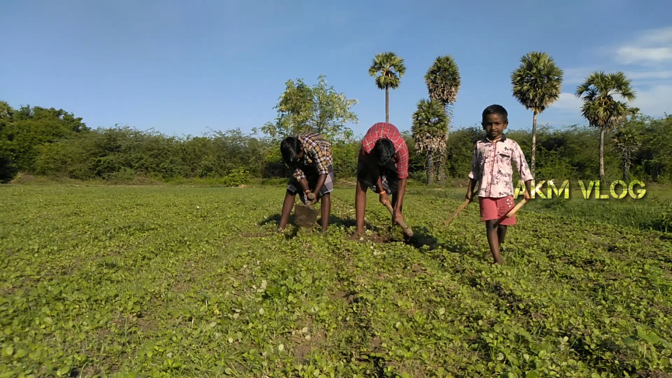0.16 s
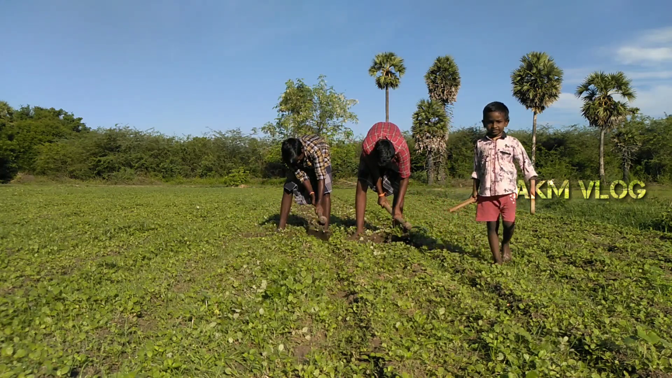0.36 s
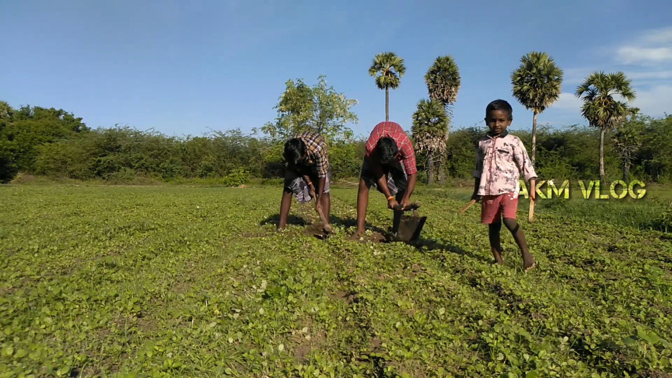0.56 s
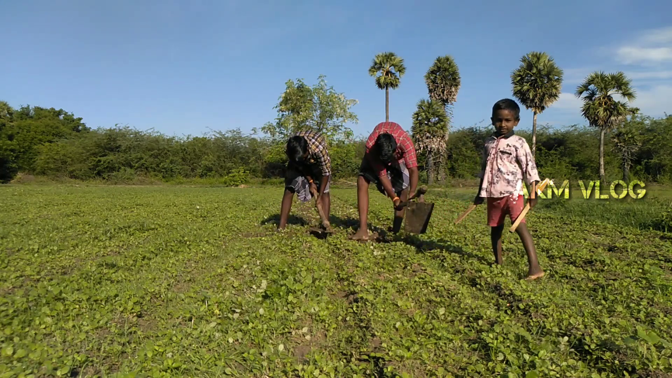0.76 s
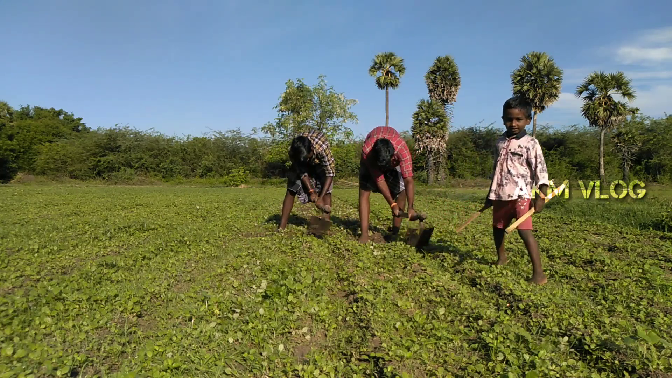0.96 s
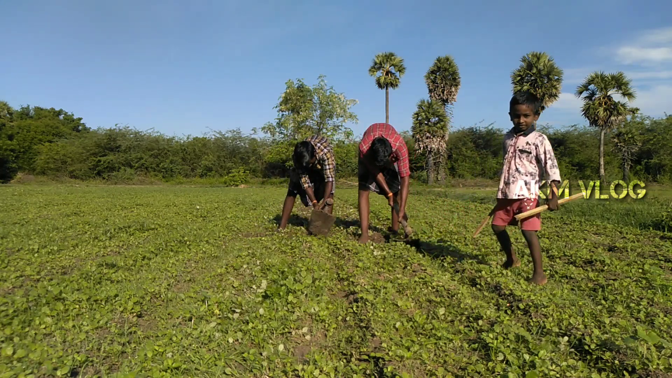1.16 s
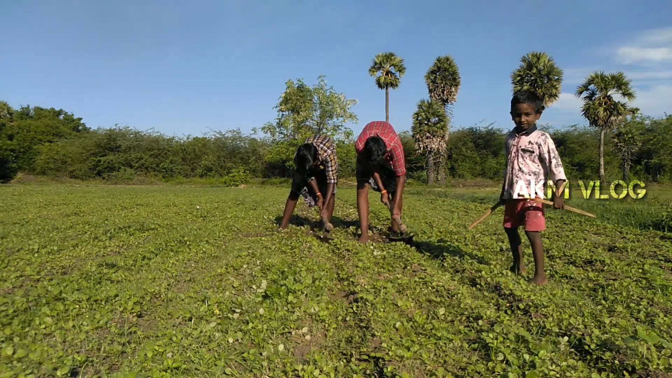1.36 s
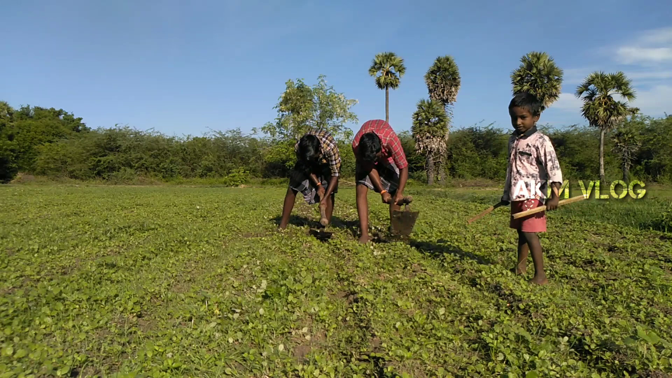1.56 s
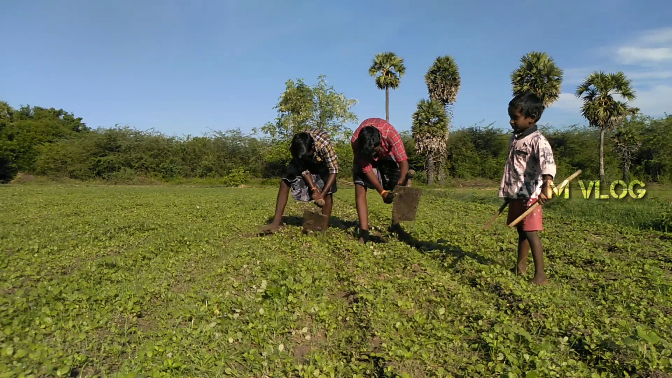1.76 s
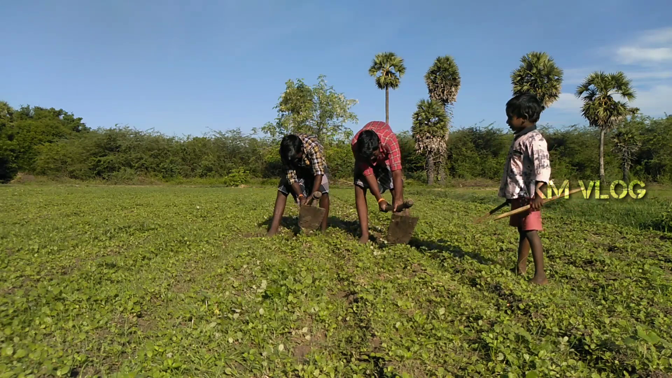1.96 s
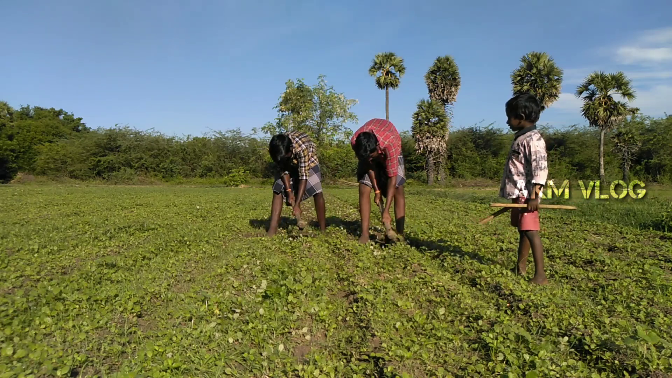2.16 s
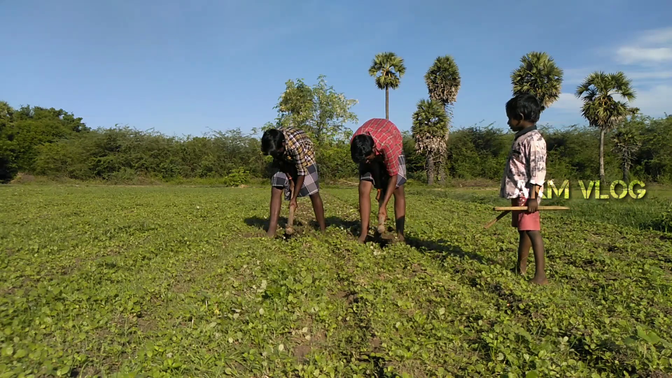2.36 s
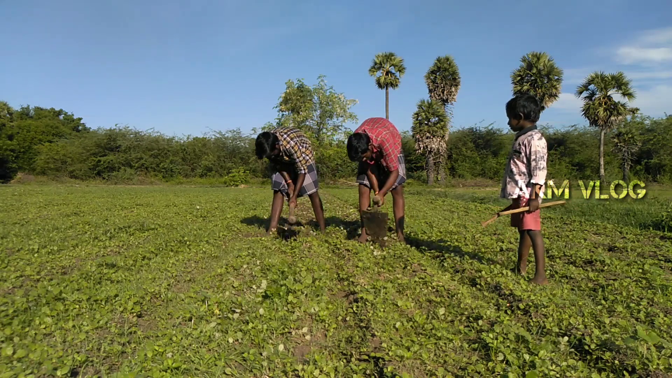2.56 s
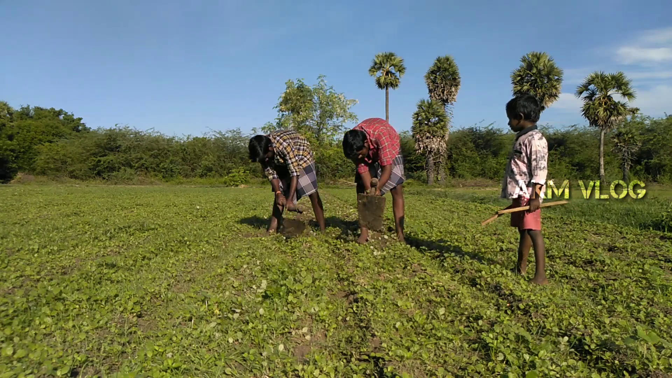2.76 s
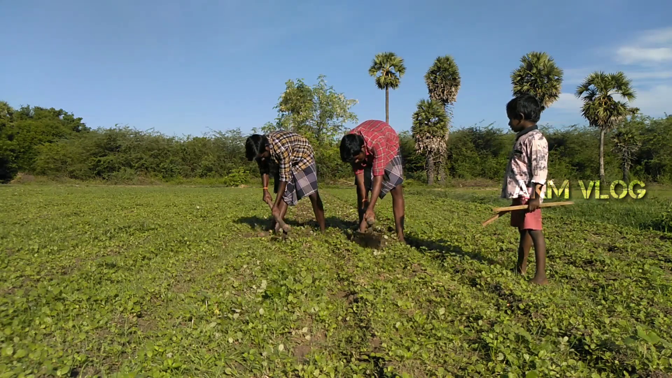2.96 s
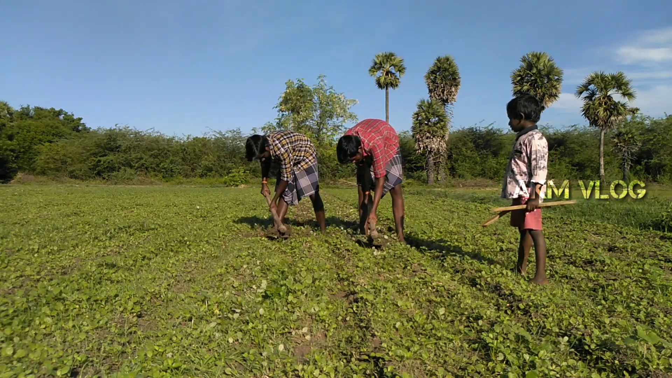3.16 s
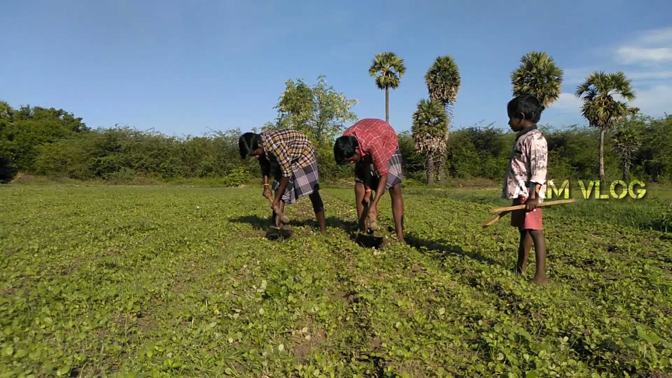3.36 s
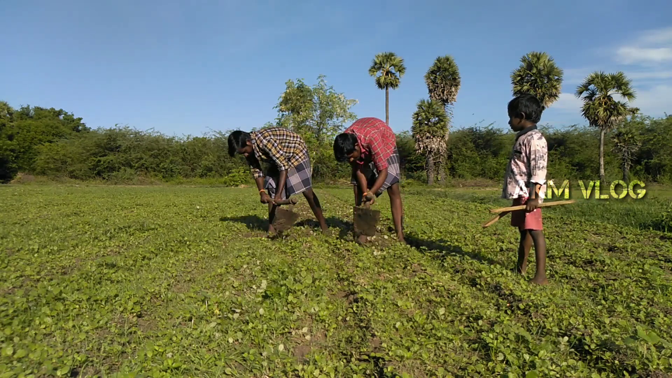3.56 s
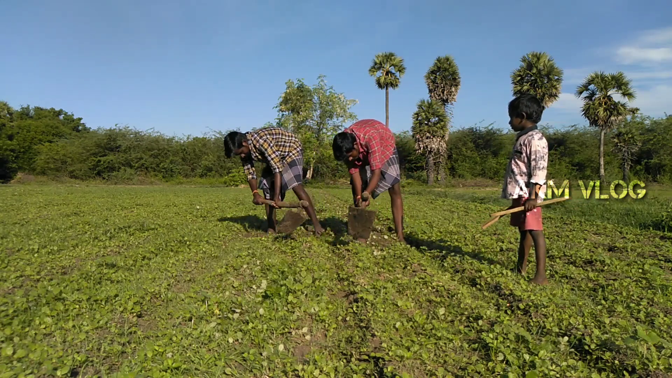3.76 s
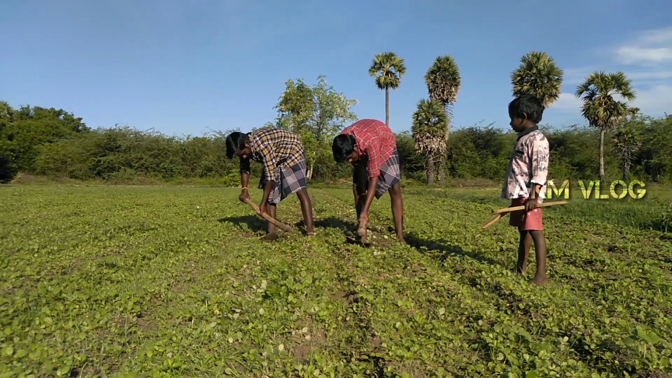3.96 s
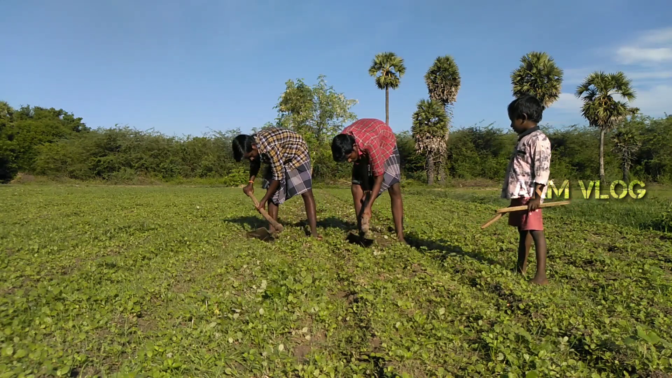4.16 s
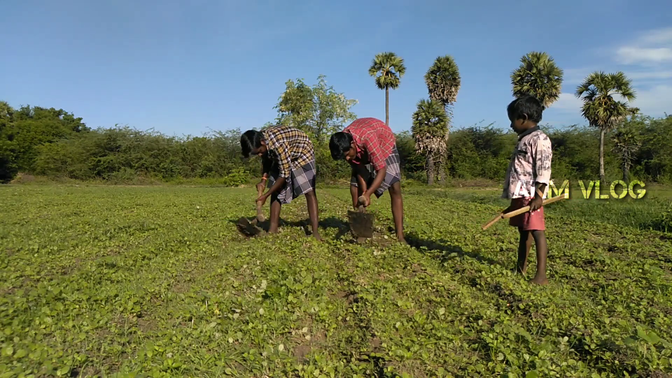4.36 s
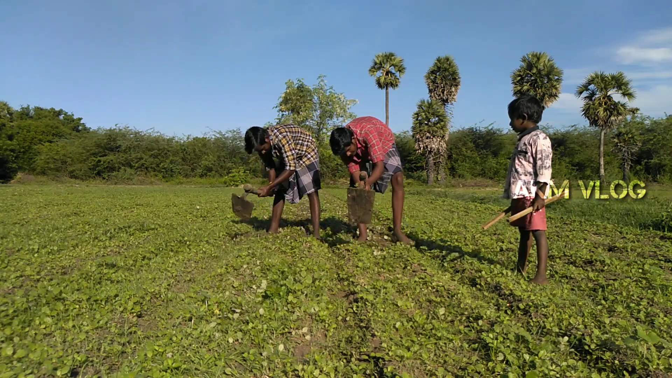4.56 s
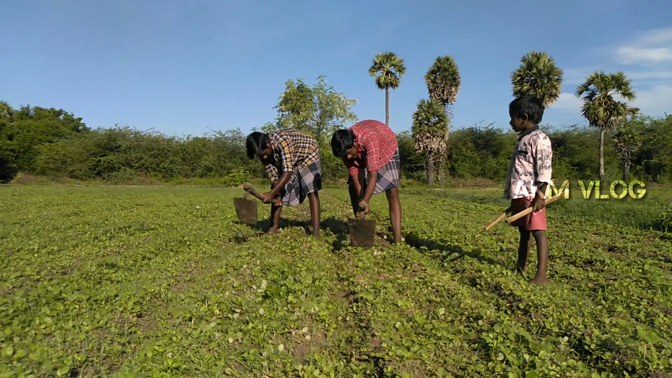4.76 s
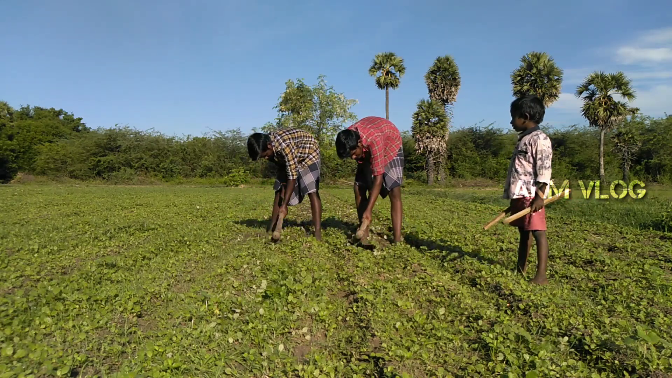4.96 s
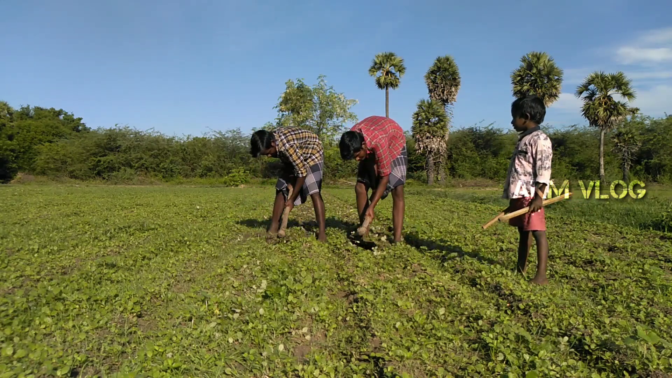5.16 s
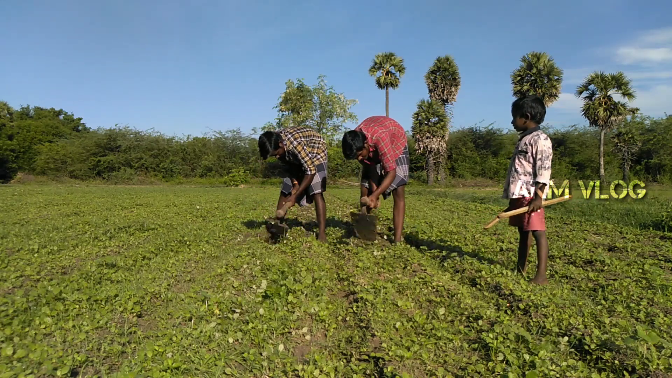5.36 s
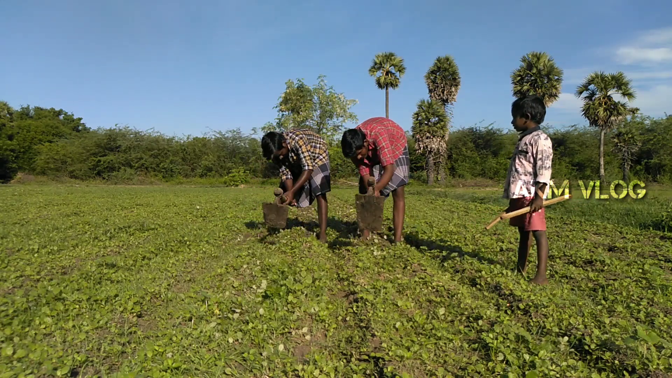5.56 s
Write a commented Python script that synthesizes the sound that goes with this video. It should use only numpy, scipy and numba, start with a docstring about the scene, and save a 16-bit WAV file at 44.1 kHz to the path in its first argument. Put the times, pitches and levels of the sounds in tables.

```python
"""A small bird trills paired falling chips on the left, over field hiss and a low rumble of wind.
A few metres to the right two short hoes cut and drag through hard dry soil: its fractures excite clods,
grit and steel, and stones knock the blades. A farther bird answers, blurred by scattering in a hedge;
others whistle. The phone's noise suppressor lets the hiss swell with the other sounds."""
import sys
import numpy as np
from scipy import signal
from scipy.fft import rfft, irfft
from scipy.io import wavfile
from scipy.ndimage import uniform_filter1d
from numba import njit

SR = 44100
rng = np.random.default_rng(int(sys.argv[2]) if len(sys.argv) > 2 else 0)


def inscribe(sig):
    """Save sig as 16-bit PCM at rate SR to the path in sys.argv[1].

    A 1-D sig is mono; a 2-D sig holds one channel per row.
    Samples are clipped to [-1, 1] before scaling.
    """
    pcm = np.round(np.clip(np.atleast_2d(sig).T, -1, 1) * 32767)
    wavfile.write(sys.argv[1], SR, pcm.astype(np.int16))


N = 246959
T = np.arange(N) / SR

# modes of the steel blade: f/Hz, level/dB, T60/s
BLADE_MODES = [(725, -9.5, 0.041), (2043, -1.5, 0.027), (2260, -7.5, .04), (2795, -31.5, .05),
               (3145, -4, 0.039), (7510, -9.5, 0.11)]
# spectrum of grit and sharp cracks: f/Hz, level/dB
GRIT_SPECTRUM = [(3500, -53), (6000, 8.5), (7500, 6.5), (10000, 7.5), (13000, 2.5), (15500, -5.5)]


def undb(db):
    return 10 ** (np.asarray(db) / 20)


def unit(x):
    return x / np.sqrt(np.mean(x ** 2))


def add(out, start_s, x):
    i = int(start_s * SR)
    out[..., i:i + x.shape[-1]] += x[..., :N - i]


def delay(x, ms):
    return np.interp(T - np.asarray(ms) / 1000, T, x)


def ramp(start, length):
    """Seconds before a span, share of the way through it, seconds after it."""
    return (start - T).clip(0), ((T - start) / length).clip(0, 1), (T - start - length).clip(0)


def walk(rate_hz):
    """Slow random modulation: held levels smoothed twice, with a spread near 1."""
    hold = int(SR / rate_hz)
    steps = np.repeat(rng.standard_normal(N // hold + 1), hold)
    return 1.3 * uniform_filter1d(uniform_filter1d(steps, hold), hold)[:N]


def colour(x, spectrum):
    """Minimum-phase filter through (f/Hz, level/dB) points, from the folded cepstrum."""
    hz, db = np.transpose(spectrum)
    gain_db = np.interp(np.log(np.arange(1, 2050) * SR / 4096), np.log(hz), db)
    cepstrum = irfft(gain_db * np.log(10) / 20)
    cepstrum[1:2048] *= 2
    cepstrum[2049:] = 0
    return signal.fftconvolve(x, irfft(np.exp(rfft(cepstrum))))[:N]


def chip(hz, tail_share):
    """A frequency-modulated note: a pulse while the pitch holds, then a tail that glides down."""
    t = np.arange(int(.0145 * SR)) / SR
    way = t / t[-1]
    pitch = hz + 60 - 1150 * way ** 2.5
    pulse = np.exp(-.5 * ((t - .0043) / .002) ** 2)
    tail = tail_share * np.sin(np.pi * way ** 1.4)
    attack = np.minimum(t / .00054, 1)
    return (pulse + tail) * attack * np.sin(2 * np.pi * np.cumsum(pitch) / SR)


def scatter(x, t60, band_hz):
    """Multiple scattering by leaves: convolution with exponentially decaying noise."""
    t = np.arange(int(.5 * SR)) / SR
    band = signal.butter(1, band_hz, "band", fs=SR, output="sos")
    response = signal.sosfilt(band, rng.standard_normal(len(t))) * undb(-60 * t / t60)
    return signal.fftconvolve(x, response / np.sqrt(np.sum(response ** 2)))[:N]


def near_bird():
    """Direct sound and diffuse reflection: trills of paired chips and their echo from the hedge."""
    # pairs of chips: t/s, level/dB, left minus right/dB
    pairs = [(-0.0101, -27, 8), (0.044, -28.5, 11), (0.1008, -27.5, 8.5), (0.706, -26, 4),
             (0.7529, -26.5, 7.5), (0.8078, -27, 7), (0.8651, -28, 9), (0.9324, -27.5, 9.5),
             (1.5518, -24.5, 7), (1.606, -26, 10), (1.662, -31.5, 21.5), (3.2516, -27.5, 2),
             (3.301, -31.5, 7), (3.3603, -30, 12), (3.802, -31, 12.5), (3.852, -28, 11),
             (3.9055, -32.5, 9.5), (3.965, -24.5, 7.5), (4.35, -26.5, 2), (4.4003, -28, 9.5),
             (4.4596, -29, 12.5), (4.8951, -25.5, 13), (4.9455, -23, 9.5), (5.001, -26, 8),
             (5.43, -28.5, 2), (5.4809, -28, 9), (5.537, -28.5, 13)]
    # soft chips ahead of a trill: lead/s, relative level/dB, f/Hz
    lead_in = [(.057, -17.5, 5690), (.028, -8.5, 5830)]
    trill_hz, gap_s, onset_s = 6086, .0174, .002
    direct, previous = np.zeros((2, N)), 0
    for s, db, pan_db in pairs:
        opens_trill = s - previous > .2
        previous = s
        hz, first_db = (trill_hz - 131, db - 1) if opens_trill else (trill_hz, db)
        notes = [(s, first_db, hz), (s + gap_s, db + 1.6, hz + 40)]
        if opens_trill:
            notes += [(s - lead, db + soft_db, low_hz) for lead, soft_db, low_hz in lead_in]
        for at, note_db, note_hz in notes:
            note = chip(note_hz, tail_share=.13 + max(6050 - note_hz, 0) / 1200)
            if at > onset_s:
                add(direct, at - onset_s, undb(note_db + np.array([[pan_db], [-pan_db]]) / 2) * note)
    direct[0] = delay(direct[0], ms=.3)
    echo = [scatter(delay(side, ms=8.8), t60=.13, band_hz=(4610, 7500)) for side in direct]
    return direct + undb(-16) * np.array(echo)


def field_hiss(foreground):
    """Downward expansion: the suppressor passes more hiss, treble most, while other sound is there."""
    # background hiss, then treble hiss, both cut off at the top: f/Hz, spectral density level/dB
    background_spectrum = [(90, -29.5), (150, 2), (450, -8), (900, -11.5), (1600, -13.5), (3000, -13),
                           (4500, -18), (5500, -5.5), (9000, -12.5), (10000, -16), (12300, -16.5),
                           (13200, -58.5)]
    treble_spectrum = [(4500, -17.5), (6500, 5.5), (8000, 0.5), (9400, 3), (9900, -30), (12300, -19.5),
                       (13200, -43.5)]
    background, treble_hiss = (
        np.array([unit(colour(rng.standard_normal(N), spectrum)) for _ in range(2)])
        for spectrum in (background_spectrum, treble_spectrum))
    power = uniform_filter1d(np.mean(foreground ** 2, axis=0), size=5000).clip(0)
    control_db = delay(uniform_filter1d(10 * np.log10(power + 1e-9), size=2500), ms=28)
    opening = 1 / (1.5 + np.exp(-(control_db + 49) / 5.4))
    background *= undb(-69 + 8.35 * opening + 1.6 * walk(2.6))
    treble_hiss *= undb(-83 + 40.7 * opening + .55 * walk(8))
    return background * undb([[3], [1.5]]) + treble_hiss * undb([[1.5], [-1.5]])


def rumble():
    """Turbulent pressure of light wind on the microphone ports, over a distant low drone."""
    # rumble spectrum: f/Hz, level/dB
    spectrum = [(20, -48), (32, -29.5), (42, -10), (55, 4), (80, 7), (110, 4), (160, -12.5), (300, -37)]
    # its rise and fall: t/s, level/dB
    envelope = [(0.0, -61), (0.15, -65), (1.36, -69), (1.65, -64.5), (1.92, -70), (2.15, -71), (2.28, -58),
                (2.4, -72), (2.62, -68), (2.73, -62.5), (3.27, -53.5), (3.54, -63), (3.77, -62.5),
                (4.05, -70.5), (4.33, -72), (4.74, -77), (5.1, -67), (5.6, -70)]
    mid, side = (unit(colour(rng.standard_normal(N), spectrum)) * undb(5.1 * walk(9)) for _ in range(2))
    level_db = np.interp(T, *np.transpose(envelope))
    return undb(level_db) * (mid + side * np.array([[.6], [-.6]]))


def strokes():
    """Incoherent addition: pushes of the blades sum in power, which also weights their pitch and lag."""
    # pushes: contact t/s, swell/s, drag/s, soil level/dB, loss over the drag/dB,
    # clods re soil/dB, grit re soil/dB, hollow under the blade f/Hz, left port lag/ms
    pushes = [(0.133, 0.017, 0.068, -36, 7.5, -8.5, 0.5, 1130, 0.22),
              (0.22, 0.0027, 0.058, -38.5, 3, 2, -1.5, 1190, 0.17),
              (0.452, 0.036, .04, -48, 8, -0.5, 14, 1400, 0.23),
              (0.498, 0.056, 0.096, -36, 8.5, 3, 2, 1460, 0.28),
              (0.663, 0.009, 0.009, -38, 11.5, 5.5, -2.5, 2100, 0.26),
              (1.1, 0.053, 0.11, -32.5, 22.5, -1, 2.5, 1076, 0.22),
              (1.407, 0.055, 0.036, -37, 8, 5, 11, 1714, 0.25),
              (1.495, 0.027, 0.014, -44.5, 2, 1.5, 3.5, 2350, 0.26),
              (2.132, 0.043, 0.023, -28, 8, 2.5, 4.5, 2120, .25),
              (2.19, .02, 0.14, -33.5, 16.5, 4, 6.5, 1737, 0.26),
              (2.488, 0.015, 0.086, -58.5, -4.5, -9, -0.5, 2500, 0.25),
              (2.591, .004, 0.0091, -46.5, 11, -24, 6, 2600, .29),
              (3.036, 0.051, 0.15, -30.5, 20.5, 2.5, 6, 2090, 0.26),
              (3.371, 0.033, 0.019, -55.5, 1.5, 4.5, 9.5, 2200, 0.38),
              (3.43, 0.041, 0.032, -59, 0, -12, 16, 2300, 0.32),
              (3.948, 0.064, 0.091, -34.5, 15, -2, 7.5, 2500, 0.21),
              (4.28, 0.054, 0.012, -54, 2.5, -9, 2, 2850, 0.23),
              (4.906, 0.009, 0.097, -35, 9.5, -4.5, 7, 2190, .2),
              (4.997, 0.024, 0.026, -29, 0, 2.5, 3.5, 1980, 0.29),
              (5.048, 0.0085, 0.036, -32, 5.5, 4, -6, 1906, 0.25),
              (5.25, 0.045, 0.11, -56.5, 15, -3.5, -10, 2200, 0.29),
              (5.375, 0.037, .01, -64, 4, -13, 22, 2200, 0.33)]
    bite_db_s, swell_db_s, lift_db_s = 2396.5, 235.5, 335.5
    grit_lead_db_s, grit_linger_db_s = 90.5, 54  # grit rises before the soil and falls after it
    crumbs, clods, grit, hollow, lag = np.full((5, N), 1e-30)
    for s, swell, drag, db, loss_db, clods_db, grit_db, hollow_hz, lag_ms in pushes:
        before, dug, _ = ramp(s, swell)
        _, dragged, after = ramp(s + swell, drag)
        to_go = (1 - dug) * swell
        rise_db = -bite_db_s * before - swell_db_s * to_go
        power = undb(db + rise_db - loss_db * dragged - lift_db_s * after) ** 2
        crumbs += power
        clods += power * undb(clods_db) ** 2
        grit += power * undb(grit_db + grit_lead_db_s * to_go + grit_linger_db_s * after) ** 2
        hollow += power * hollow_hz
        lag += power * lag_ms
    return np.sqrt([crumbs, clods, grit]), (hollow / crumbs).clip(500, 5000), lag / crumbs


def grains(share, spread_db):
    """Shot noise: particles break on a share of the samples, most small, a few large."""
    pick, size = rng.random(N), rng.standard_exponential(N)
    return (pick < share) * rng.standard_normal(N) * undb(spread_db * size)


def lumps(breaks, lo_hz, hi_hz, q):
    """Damped resonance: lumps of eight sizes ring at their own pitch and take turns in breaking."""
    out = 0
    for hz in np.geomspace(lo_hz, hi_hz, 8):
        ringing = signal.lfilter(*signal.iirpeak(hz, q, fs=SR), breaks)
        out += ringing * undb(4.5 * walk(28.057)) / np.sqrt(hz)
    return out


def ring(hz, t60):
    """Free vibration of one damped mode."""
    t = np.arange(int(.092 * SR)) / SR
    return np.sin(2 * np.pi * hz * t) * undb(-60 * t / t60)


@njit
def cavity(x, hz, q):
    """Resonance of the hollow under the blade: a state-variable band-pass whose centre moves."""
    out, band_state, low_state = np.empty(len(x)), 0., 0.
    for i in range(len(x)):
        g = np.tan(np.pi * hz[i] / SR)
        band = (band_state + g * (x[i] - low_state)) / (1 + g * (g + 1 / q))
        band_state = 2 * band - band_state
        low_state += 2 * g * band
        out[i] = band / q
    return out


def soil(gains, hollow_hz):
    """Brittle fracture: the same breaks in the crust excite crumbs, clods, grit, steel and hollow."""
    # crumbs, then clods: f/Hz, level/dB
    crumb_spectrum = [(700, -1), (1400, 13), (2200, 6), (3500, 7), (5000, 10), (6500, 6), (10000, -17)]
    clod_spectrum = [(80, -39.5), (200, -16), (500, -8), (900, 4.5), (1300, 6.5), (2500, -27)]
    soil_gain, clod_gain, grit_gain = gains
    breaks = grains(share=.15, spread_db=1.79)
    crumbs = unit(colour(lumps(breaks, 1140, 7080, q=3.13), crumb_spectrum)) * undb(6)
    coarse_breaks = breaks + 1.4 * grains(share=.03, spread_db=1.6)
    clods = unit(colour(lumps(coarse_breaks, 148, 1480, q=2.62), clod_spectrum))
    spray = .3 * breaks + grains(share=.5, spread_db=1.3)
    grit = unit(colour(spray, GRIT_SPECTRUM)) * undb(.43 * walk(35))
    blade = sum(undb(db) * ring(hz, t60) for hz, db, t60 in BLADE_MODES)
    steel = unit(signal.fftconvolve(breaks, blade)[:N]) * undb(-5.5)
    hollow = unit(cavity(breaks, hollow_hz, 5.0)) * undb(-1.5)
    return (crumbs + steel + hollow) * soil_gain + clods * clod_gain + grit * grit_gain


def thuds():
    """Impulse response of the ground: a deep blow excites one low, heavily damped mode."""
    # the blade bottoms out: t/s, level/dB
    blows = [(0.136, -72), (1.428, -61), (2.149, -50), (3.089, -34), (4.905, -32), (5.031, -39)]
    out = np.zeros(N)
    for s, db in blows:
        add(out, s, undb(db) * ring(hz=130, t60=.055))
    return out


def knocks():
    """Impact excitation: stone and blade ring in their own modes, with a snap and a treble crack."""
    # stones against a blade: t/s, level/dB, f/Hz, relative level of the crack/dB
    stones = [(0.138, -25.5, 1110, -15), (0.225, -13, 1540, -24), (0.235, -20, 3160, -12),
              (0.266, -24.5, 960, -4.5), (0.491, -28, 3940, 3.5), (0.516, -40, 655, -4),
              (0.564, -27, 2400, -9), (0.667, -23, 2500, -27), (1.102, -53, 4230, -23),
              (1.217, -36, 1090, -21), (1.433, -29, 2360, 8), (1.521, -31, 3330, -15),
              (2.137, -39, 3560, 13), (2.156, -21.5, 2300, -2.5), (2.198, -25, 3380, -9),
              (2.238, -23, 3060, 4), (2.299, -30, 580, -3.5), (2.324, -30.5, 666, -36),
              (2.356, -30.5, 2130, -11), (2.595, -30.5, 3500, -33), (3.024, -39.5, 3360, 9),
              (3.039, -21.5, 3230, 8), (3.085, -15.5, 3540, -11), (3.401, -35, 1810, -24),
              (3.947, -28, 3750, -13.5), (3.991, -21, 3840, -17), (4.015, -26, 3010, -11),
              (4.027, -25, 3400, -14), (4.327, -40.5, 3820, -8), (4.356, -42, 3140, -17),
              (4.906, -28, 3790, -8), (4.929, -25.5, 3650, -4), (4.986, -21, 3620, -2),
              (5.005, -19, 2380, -2), (5.033, -8.5, 1930, -25)]
    # splintering snap: f/Hz, level/dB
    snap_spectrum = [(400, -24), (1200, -3), (2500, 0), (4000, -3), (7000, -24)]
    stone_t60, snap_t60, crack_t60 = .018, .0051, .0084  # s
    tones, snaps, cracks = np.zeros((3, N))
    t = np.arange(400) / SR
    for s, db, hz, crack_db in stones:
        mode_spread_db = 2.6 * rng.standard_normal(len(BLADE_MODES))
        blade = sum(undb(mode_db + spread_db) * ring(mode_hz, t60)
                    for (mode_hz, mode_db, t60), spread_db in zip(BLADE_MODES, mode_spread_db))
        burst = rng.standard_normal(len(t))
        add(tones, s, undb(db) * (ring(hz, stone_t60) + undb(-18) * blade))
        add(snaps, s, undb(db - 60 * t / snap_t60) * burst)
        add(cracks, s, undb(db + crack_db - 60 * t / crack_t60) * burst)
    return tones + undb(8) * colour(snaps, snap_spectrum) + undb(6.5) * colour(cracks, GRIT_SPECTRUM)


def hoes():
    """Acoustic shadow: the right port faces the work; the left hears it late, dull and less coherent."""
    # share of other grains at the left port: f/Hz, level/dB
    diffuse_share = [(150, -19), (500, -3), (1200, -1), (2500, -15), (6000, 13), (15000, 5.5)]
    # shadow of the phone's body: f/Hz, level/dB
    shadow = [(100, -5.5), (800, -1), (1500, -2), (2500, -7), (4500, -7.5), (7000, -19.5), (10000, -21.5),
              (15000, -21.5)]
    gains, hollow_hz, lag_ms = strokes()
    gains *= undb(2.4 * walk(45))
    right = soil(gains, hollow_hz) + thuds() + knocks()
    delayed = delay(right, uniform_filter1d(lag_ms, size=2000))
    other_grains = colour(soil(gains, hollow_hz), diffuse_share)
    return np.array([colour(delayed + other_grains, shadow), right])


def far_bird():
    """Diffuse sound: a distant trill arrives as scatter alone, its crowded chips run together."""
    # phrases: t/s, length/s, starting level/dB, final level/dB
    phrases = [(0.3, 0.028, -74, -75), (0.47, 0.254, -46, -48), (1.202, 0.1, -45, -50.5),
               (1.667, 0.12, -47, -52.5), (1.966, 0.17, -67.5, -68), (2.303, 0.09, -39, -52),
               (2.623, 0.21, -50, -52), (3.513, 0.37, -58, -52), (4.12, 0.15, -46, -68),
               (4.818, 0.031, -63, -66), (5.086, 0.19, -40.5, -46.5)]
    rise_db_s, fade_db_s = 898, 359
    song, gain = np.zeros((2, N))
    starts = np.cumsum(.009 + .008 * rng.random(700))
    for s, hz in zip(starts[starts < T[-1]], rng.uniform(5500, 6100, 700)):
        add(song, s, chip(hz, tail_share=1))
    blur = np.array([unit(scatter(song, t60=.25, band_hz=(4000, 8000))) for _ in range(2)])
    for s, length, db, end_db in phrases:
        before, way, after = ramp(s, length)
        gain += undb(db + (end_db - db) * way - rise_db_s * before - fade_db_s * after)
    return blur * gain * undb([[5], [-8]])


def whistles():
    """Random modulation: thin gliding tones flutter and waver on their way across the field."""
    # bird whistles: t/s, length/s, first f/Hz, middle f/Hz, last f/Hz, level/dB, left minus right/dB
    calls = [(3.72, .085, 7770, 6600, 6050, -55, 15.5), (4.56, .105, 7500, 6400, 5600, -65, 13),
             (5.25, .09, 3570, 4070, 3360, -71, 8), (3.345, .155, 2380, 2320, 2350, -57, 10),
             (5.24, .35, 1297, 1285, 1290, -72, 1)]
    out = np.zeros((2, N))
    for s, length, first_hz, mid_hz, last_hz, db, pan_db in calls:
        before, way, after = ramp(s, length)
        glide_hz = np.polyval(np.polyfit([0, .5, 1], [first_hz, mid_hz, last_hz], 2), way)
        tone = np.sin(2 * np.pi * np.cumsum(glide_hz * (1 + .006 * walk(200))) / SR)
        flutter_db = 3.2 * walk(250)
        edge_db = -5.5 * (2 * way - 1) ** 2 - 8000 * (before + after)
        out += tone * undb(db + edge_db + flutter_db) * undb([[pan_db / 2], [-pan_db / 2]])
    return out


def scene():
    """Superposition of all sources; hoes and birds drive the suppressor."""
    foreground = hoes() + near_bird() + far_bird() + whistles()
    return foreground + field_hiss(foreground) + rumble()


def record(dry):
    """Band limiting: the phone's steep low-pass cuts the top."""
    cutoff_hz = 15750
    return signal.sosfilt(signal.ellip(10, .2, 80, cutoff_hz, fs=SR, output="sos"), dry)


dry = scene()
out = record(dry)
inscribe(out)
```